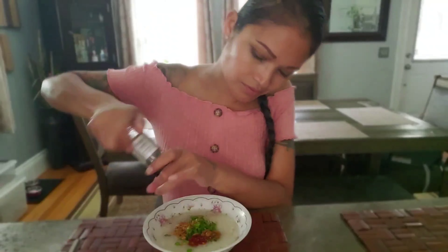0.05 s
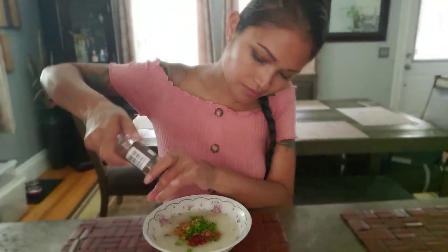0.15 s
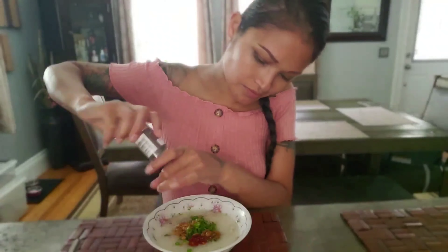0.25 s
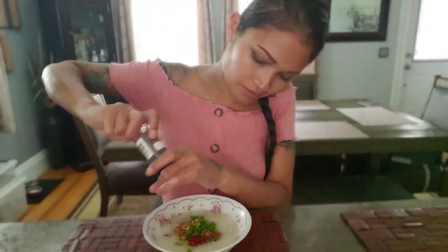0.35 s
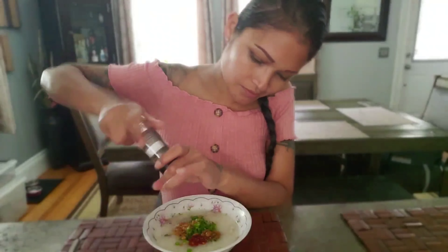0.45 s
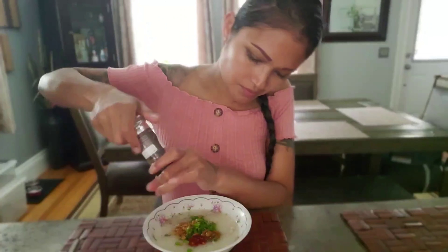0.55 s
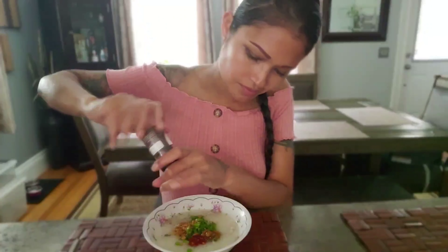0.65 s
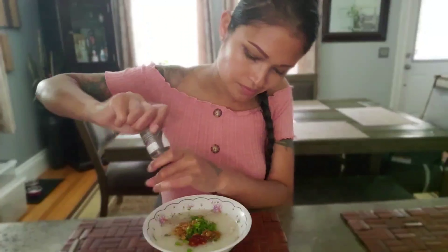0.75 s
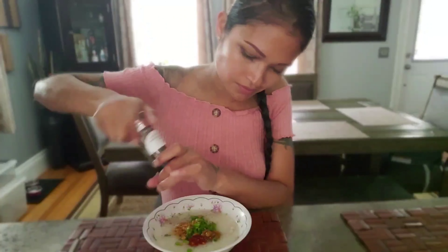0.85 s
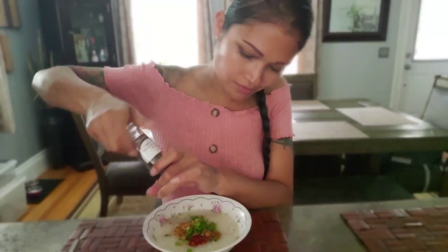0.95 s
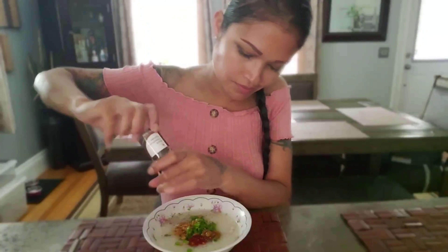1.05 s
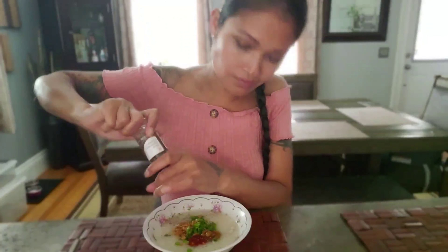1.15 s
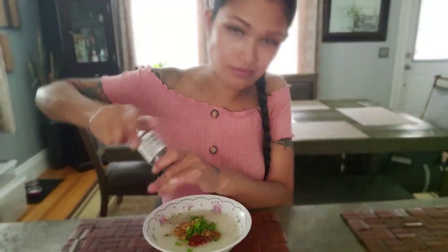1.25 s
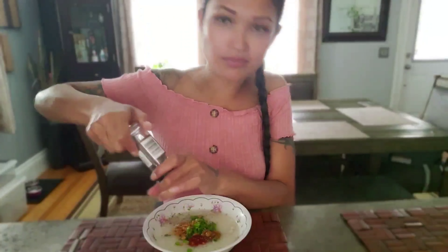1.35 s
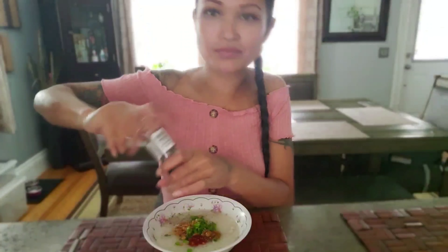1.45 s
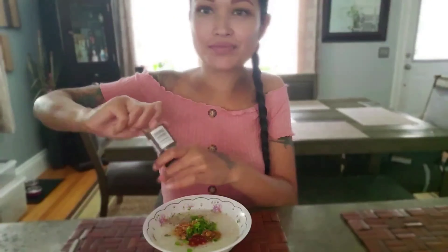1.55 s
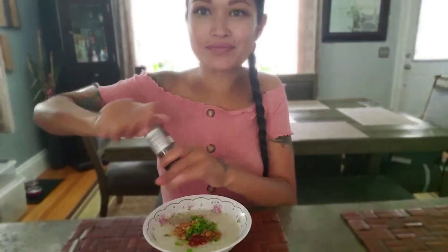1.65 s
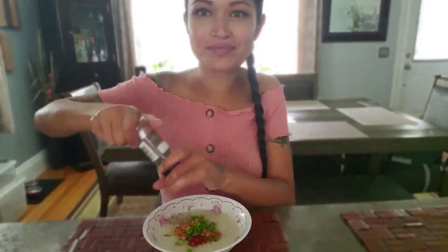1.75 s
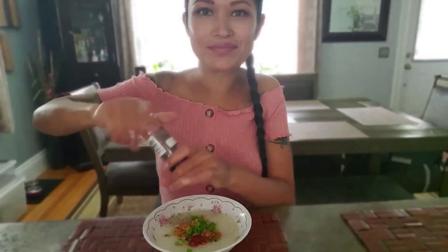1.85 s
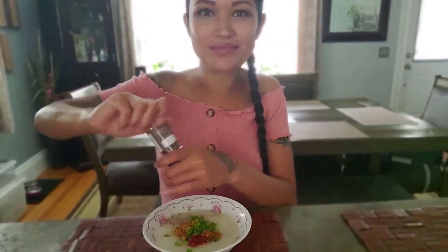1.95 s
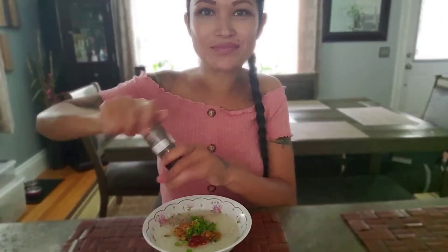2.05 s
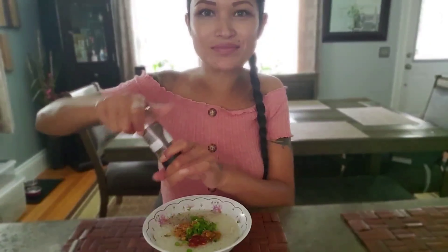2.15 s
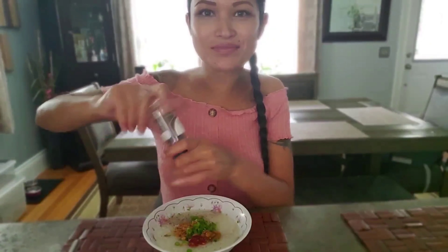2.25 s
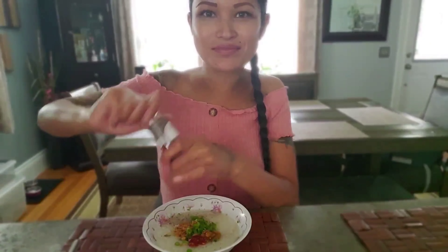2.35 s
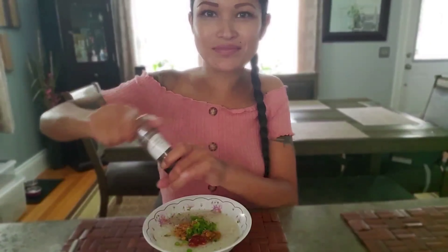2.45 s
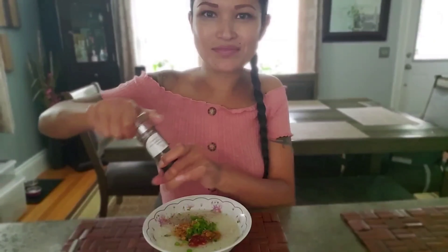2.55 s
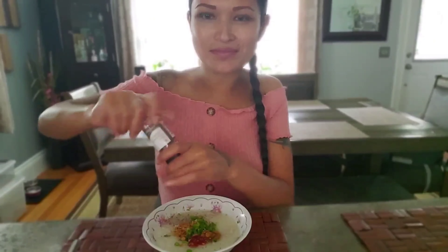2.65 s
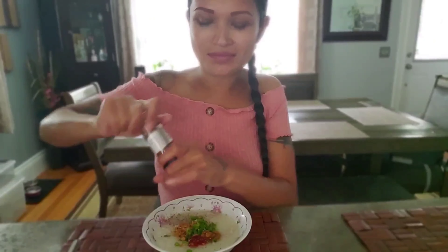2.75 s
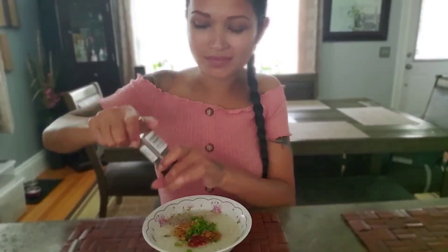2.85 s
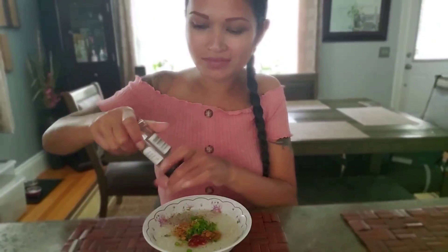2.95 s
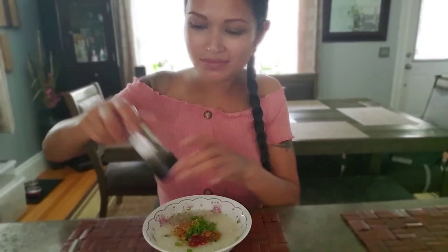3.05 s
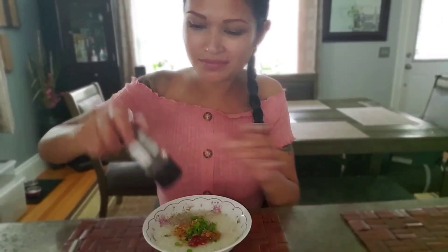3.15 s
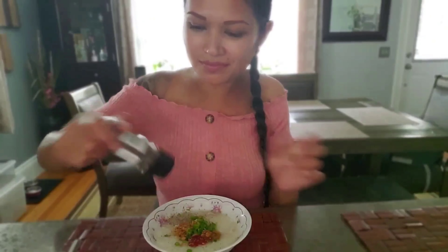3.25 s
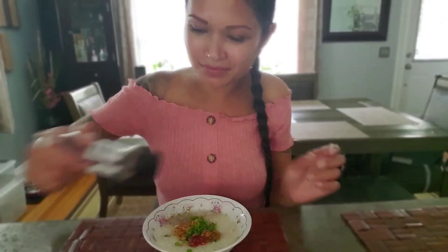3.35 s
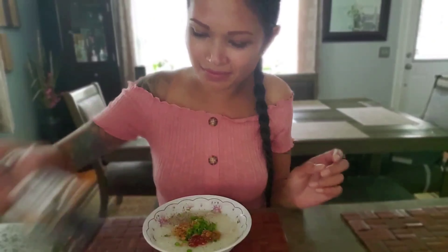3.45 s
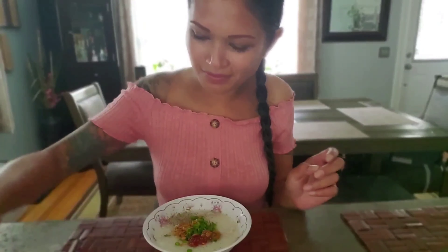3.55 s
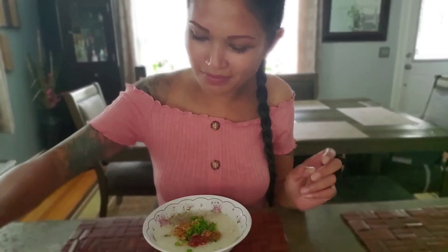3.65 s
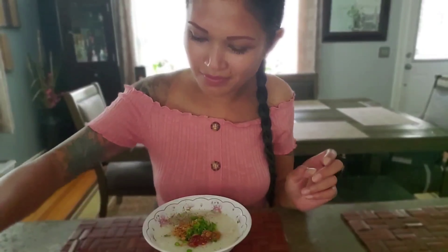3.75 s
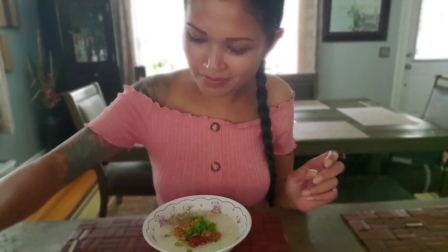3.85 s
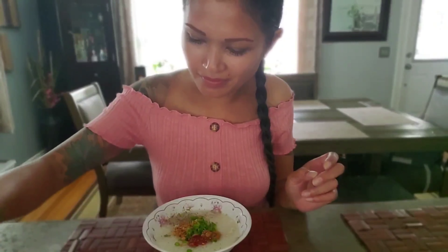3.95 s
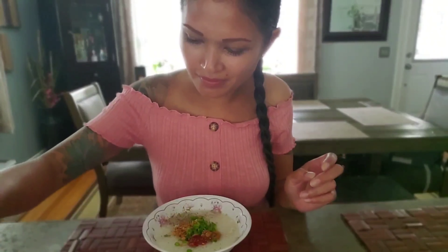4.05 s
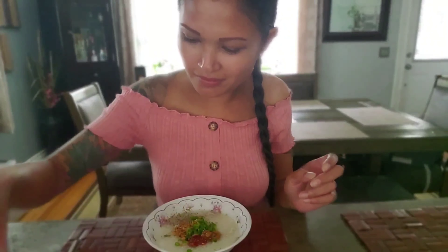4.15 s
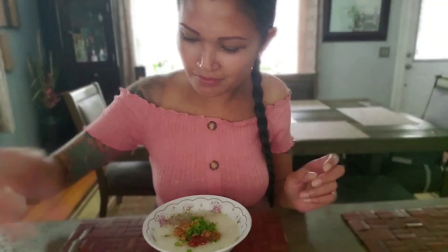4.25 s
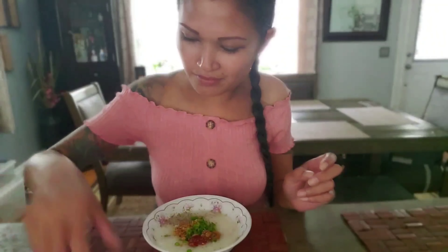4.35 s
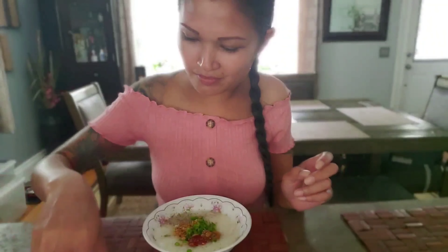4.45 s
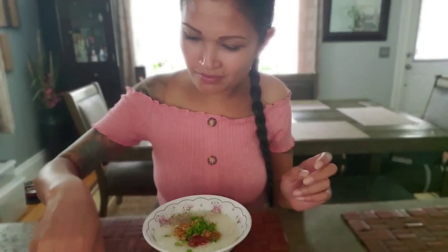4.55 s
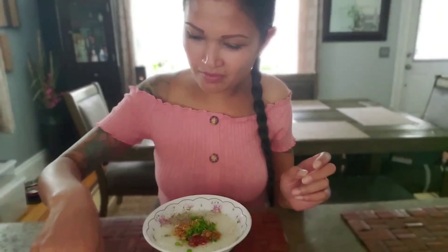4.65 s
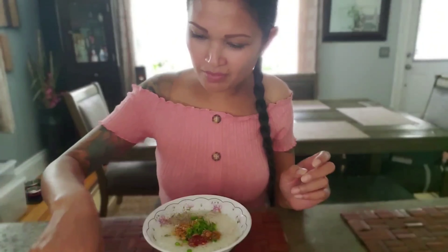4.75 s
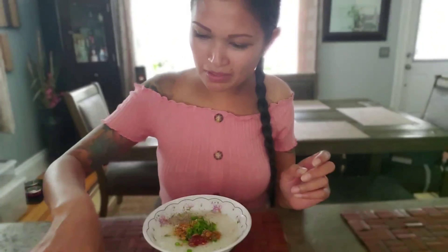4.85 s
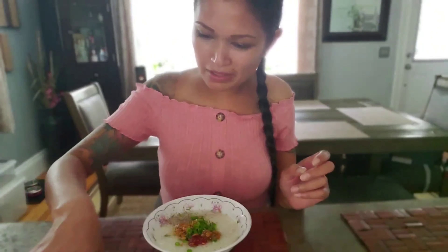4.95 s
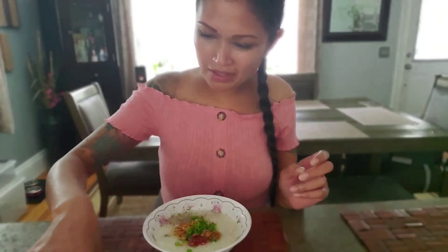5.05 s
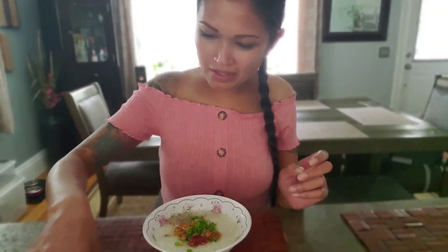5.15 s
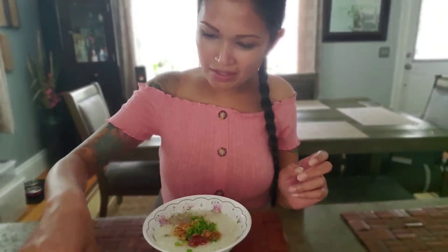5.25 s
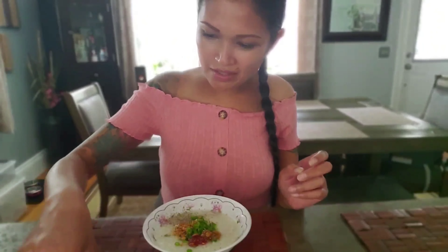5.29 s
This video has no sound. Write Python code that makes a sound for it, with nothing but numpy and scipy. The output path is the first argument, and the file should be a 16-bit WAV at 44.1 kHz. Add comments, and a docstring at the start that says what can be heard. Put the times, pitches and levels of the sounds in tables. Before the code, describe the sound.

Eight quick dry rasps of peppercorns cracking in a grinder, close up, then handling, muffled thuds and a faint slide on a table.

```python
"""A hand-twisted pepper grinder is turned eight times over a dish, in a lively dining room with a faint hum.
Each twist crushes peppercorns: sharp cracks (short noise puffs) over fine crumbling (dense tiny grains).
The cap sings thinly as the hand takes a new grip: uneven slips drive a narrow resonance.
Then the grinder is set down on the table, and a few soft knocks (clicks and dying sines) and a slide follow.
Echoes and a fading noise tail make the room; wavering sines and filtered noise make the hum and air."""
import sys
import numpy as np
from scipy import signal
from scipy.fft import rfft, irfft
from scipy.io import wavfile

SR = 44100
rng = np.random.default_rng(int(sys.argv[2]) if len(sys.argv) > 2 else 0)


def wav_out(sig):
    """Save sig, one row per channel (or a flat mono array), as 16-bit PCM at SR to the path in sys.argv[1]."""
    wavfile.write(sys.argv[1], SR, np.round(np.clip(np.atleast_2d(sig).T, -1, 1) * 32767).astype(np.int16))


N = 259831  # length in samples

# Levels in the tables come before the trims in the functions and the final tone shaping.
# Colours give only the balance between pitches.

# The steady hum. Each row: pitch in Hz, level in dB.
HUM_TONES = [(119.5, -64.5), (293.7, -57.5), (587.4, -79), (694.6, -82), (855, -83)]
# Colour of the room's low rush. Each row: pitch in Hz, relative level per Hz in dB.
AIR_COLOUR = [(20, -25), (50, -2), (110, -0.5), (180, -9), (300, -5), (500, -18), (800, -24), (1100, -34),
              (2500, -41.5), (6000, -43), (13000, -44), (16000, -48.5)]
# How long the room rings. Each row: pitch in Hz, time to fade by 60 dB in seconds.
ROOM_FADE = [(150, 0.9), (600, 0.36), (1400, 0.44), (3500, 0.39), (8000, .39), (15000, 0.35)]
# Reflections off table, dish and body. Each row: delay in seconds (scattered by up to 0.2 ms either way), level
# in dB.
NEAR_ECHOES = [(.0037, -8), (.0067, -12), (0.0113, -17.5), (0.0126, -20.5)]

# Knocks on the table. Each row: start in seconds, then click, wooden ring and deep thud levels in dB.
KNOCKS = [(3.012, -46, -83, -78), (3.754, -60.5, -81, -77.5), (3.811, -31.5, -50.5, -66),
          (3.836, -42, -77, -41.5), (4.09, -64, -68.5, -35), (4.657, -45, -50.5, -60),
          (4.832, -63, -53, -51), (5.385, -63, -71, -77)]
# Colour of a table click. Each row: pitch in Hz, relative level per Hz in dB.
CLICK_COLOUR = [(150, -11), (500, -10), (800, -16.5), (1600, 1.5), (2400, -3.5), (3200, -1), (4200, -1),
                (6000, -14.5), (9000, -17), (15000, -15)]
# Upper ringing of the table top. Each row: pitch in Hz, relative level in dB, time to fade by 60 dB in seconds.
WOOD_MODES = [(186, 8, 0.083), (252, -1.5, 0.13), (537, 0, 0.23), (1610, -9.5, 0.078), (2060, -20, .07),
              (2440, -10, 0.17)]
# Deep ringing of the table. Each row: pitch in Hz, relative level in dB, time to fade by 60 dB in seconds.
THUD_MODES = [(108.6, 1.5, 0.38), (128.5, -2, 0.2), (158.9, 6, 0.071)]

# The cap rubbing as it is gripped again. Each row: start in seconds, length in seconds, level in dB.
CAP_SQUEAKS = [(0.306, .1, -63), (0.662, .14, -58), (0.987, .2, -62.5), (1.484, 0.12, -55.5),
               (1.886, 0.13, -58.5), (2.281, .07, -51.5), (3.178, 0.18, -63.5)]
# Short ticks of the cap (the three rows before 1.6 s) and fingers brushing grinder and table. Each row: # start
# in seconds, length in seconds, level in dB, brightness in dB per octave.
TICKS_AND_BRUSHES = [(1.121, 0.0055, -53, 1), (1.529, .0069, -56.5, 2), (1.587, 0.004, -60, 1),
                     (2.359, .012, -42, 3.5), (2.983, 0.091, -60, -2.5), (3.186, 0.12, -54.5, 2),
                     (3.817, 0.092, -55, -3), (4.65, 0.09, -60, -3.5), (4.751, .19, -61.5, -6.5),
                     (5.001, 0.089, -61, -4), (5.032, 0.014, -50, 8.5)]
# Colour of rubbing skin before the brightness is set. Each row: pitch in Hz, relative level per Hz in dB.
SKIN_COLOUR = [(200, -12), (600, 3.5), (1300, -2), (2000, -5), (3700, -1), (5200, -4), (7500, 4),
               (14000, -6.5)]

# The twists. Each row: start in seconds, moment the burr bites in seconds, end in seconds,
# crisp crumbling level in dB, husky crumbling level in dB, pitch where the body sounds most in Hz.
TWISTS = [(0, -0.02, .116, -29.5, -32.5, 1800), (0.391, 0.429, 0.49, -31, -32, 2100),
          (0.774, 0.817, 0.88, -33.5, -33, 2100), (1.182, 1.262, 1.302, -35.5, -35.5, 2214),
          (1.638, 1.647, 1.718, -35, -27.5, 1700), (2.018, 2.024, 2.122, -31.5, -35.5, 2900),
          (2.373, 2.423, 2.538, -29.5, -38.5, 3300), (2.773, 2.792, 2.87, -43, -40, 3090)]
# Whole peppercorns that split. Each row: time in seconds, snap level in dB,
# level of the knock on the grinder's body in dB, centre pitch of the snap in Hz.
CRACKS = [(0.0093, -14.5, -27, 13500), (.0277, -17, -28.5, 9840), (0.0331, -22, -30, 6800),
          (0.0388, -26.5, -25.5, 7000), (0.066, -17.5, -33, 9320), (0.0861, -23, -28, 9355),
          (0.1009, -15, -36.5, 6600), (0.4095, -19, -44, 7000), (0.433, -18.5, -27.5, 9200),
          (0.4543, -19.5, -29.5, 13900), (0.47, -28, -18, 6033), (.4739, -36, -23.5, 7400),
          (0.787, -27.5, -31.5, 7284), (0.8193, -20.5, -27, 12240), (.8558, -31, -21, 7600),
          (.8795, -23, -35.5, 7500), (1.1869, -25, -39.5, 7290), (1.2264, -25.5, -41.5, 8335),
          (1.2411, -27.5, -29, 7230), (1.2736, -14, -29.5, 8900), (1.6436, -21.5, -19.5, 8990),
          (1.6636, -17.5, -36, 6900), (1.6835, -20.5, -24, 9210), (1.7052, -12.5, -31.5, 7600),
          (1.7163, -19, -26, 8990), (2.0293, -21.5, -25.5, 9100), (2.0528, -17.5, -23.5, 8970),
          (2.1033, -19.5, -25.5, 6770), (2.1147, -25, -26, 7000), (2.403, -29, -41.5, 7610),
          (2.4219, -16, -24.5, 9030), (2.4339, -14.5, -33, 13300), (2.4927, -17, -27.5, 8600),
          (2.7797, -39, -28.5, 9300), (2.7978, -26.5, -33.5, 7500), (2.8222, -14, -32, 6790)]
# Colour of a splitting corn. Each row: pitch in Hz, relative level per Hz in dB.
SNAP_COLOUR = [(1500, -41), (3500, -4), (5000, -5.5), (6900, 2), (8000, -2), (9100, -0.5), (10200, -5),
               (12000, -2), (14500, -3.5), (16000, -24.5)]
# Colour of the grinder's body. Each row: pitch in Hz, relative level per Hz in dB.
BODY_COLOUR = [(100, -15), (300, -15), (700, -19), (950, -13.5), (1350, -3), (2000, -3), (2550, 4.5),
               (3100, -2), (4000, -3.5), (5500, -14), (9000, -30.5)]
# The grinder's short ringing. Each row: pitch in Hz, gain in dB, time to fade by 60 dB in seconds.
SHELL_MODES = [(1254, -52, 0.27), (1415, -53, .09), (1652, -49, .11), (1813, -56, 0.044),
               (2160, -51.5, .07), (2404, -54, .07), (2678, -55.5, 0.068), (3718, -56.5, .07)]

# Final treble roll-off. Each row: pitch in Hz, gain in dB.
TREBLE_ROLLOFF = [(14700, -1), (15200, -22.5), (16000, -22.5)]

AIR_DB = -56.5
# the slide on the table swells and fades: times, loudest level and the drop at its ends
SLIDE_START_S, SLIDE_PEAK_S, SLIDE_END_S, SLIDE_DB, SLIDE_FADE_DB = 4.545, 4.674, 4.98, -61, -16.5
# its pitch at the loudest moment, how far that moves with the level, and the resonance's width
SLIDE_HZ, SLIDE_HZ_PER_DB, SLIDE_WIDTH_HZ = 2605, 4, 280
SQUEAK_HZ = 7688
# the fingers close on the cap just before each later twist; the tilt is in dB per octave
GRIP_LEAD_S, GRIP_S, GRIP_DB, GRIP_TILT_DB = .034, 0.025, -59, 3.5
# time to get the turn going, level while it runs slack, and how long before the bite the force rises
TAKE_UP_S, SLACK_DB, BITE_S = 0.0077, -7, 0.0022
# fragments that break again as the burr's teeth pass: levels are relative to the twist's crumbling
CHIPS_PER_S, CHIP_SNAP_DB, CHIP_KNOCK_DB, CHIP_SPREAD_DB = 80, 3.5, -2.5, 2.5
CHIP_HZ, CHIP_OCTAVES = 7850, .14  # centre and scatter of their pitch
KNOCK_OCTAVES_PER_DB = .02  # the stronger the snap beside the knock, the higher the body sounds
KNOCK_SCATTER_OCTAVES = .25  # each fracture strikes the body at another place
CEILING = .85  # peaks are rounded off near this level (full scale is 1)
EDGE_HZ = 16500  # upper limit of the sound


def amp(db):
    """Turns decibels into a gain."""
    return 10 ** (np.asarray(db) / 20)


def unit(x):
    """Scales a sound to an average (rms) strength of 1."""
    return x / np.sqrt(np.mean(x ** 2) + 1e-20)


def read(points, hz):
    """Reads a table between its rows, with pitch on a logarithmic scale."""
    f, value = np.transpose(points)
    return np.interp(np.log(hz + 1), np.log(f + 1), value)


def add(mix, s, sound):
    """Mixes a sound in at a time in seconds."""
    part = mix[..., max(round(s * SR), 0):][..., :sound.shape[-1]]
    part += sound[..., :part.shape[-1]]


def colour(x, points, size=2048):
    """Filters with a table's colour; the filter has unit energy and never sounds ahead of its input."""
    cepstrum = irfft(np.log(amp(read(points, np.fft.rfftfreq(size, 1 / SR)))))
    # folding the cepstrum forward in time packs the filter's energy at its start
    cepstrum[1:size // 2] *= 2
    cepstrum[size // 2 + 1:] = 0
    taps = irfft(np.exp(rfft(cepstrum)))
    taps /= np.linalg.norm(taps)
    return signal.oaconvolve(x, taps[None], axes=1)[:, :x.shape[1]]


def pair(noise, likeness):
    """Turns three unrelated signals into two channels that share a part."""
    share = np.clip(likeness, 0, 1)
    return np.sqrt(share) * noise[0] + np.sqrt(1 - share) * noise[1:]


def ring(modes):
    """A struck object rings: a sum of dying sines, half a second long."""
    t = np.arange(SR // 2) / SR
    return sum(amp(db) * 1e-3 ** (t / t60) * np.sin(2 * np.pi * hz * t) for hz, db, t60 in modes)


def resonate(x, hz, width):
    """A steep resonance at a fixed or moving pitch, scaled to rms 1."""
    turn = np.exp(2j * np.pi * np.cumsum(hz * np.ones(x.shape[1])) / SR)
    pole = np.exp(-np.pi * width / SR)
    # shift the pitch down to zero, smooth twice, and shift it back
    smooth = signal.lfilter([1], np.poly([pole, pole]), x / turn)
    return unit((turn * smooth).real)


def burst(decay, likeness, centre_hz, bump_db, octaves=0.063, size=512):
    """A dying noise puff shaped round its own pitch, with the energy of 2 ms at rms 1."""
    t, hz = np.arange(size) / SR, np.fft.rfftfreq(size, 1 / SR)
    noise = pair(rng.standard_normal((3, size)), likeness)
    puff = rfft(np.roll(noise * t * np.exp(-t / decay), size // 32, axis=1))
    puff /= np.sqrt(abs(puff) + 1e-12)  # a brittle break leaves few gaps in its spectrum
    bump = np.exp(-.5 * (np.log2((hz + 1) / centre_hz) / octaves) ** 2)
    return unit(irfft(puff * amp(bump_db * bump))) * np.sqrt(.002 * SR / size)


def crumbs(per_s, spread_db, likeness):
    """A dense train of tiny noise grains of uneven size; each one's power dies with a 0.3 ms time constant."""
    happens = rng.random(N) < per_s / SR
    size = amp(spread_db * np.minimum(rng.exponential(1, N), 3)) * happens
    power = signal.lfilter([1], [1, -np.exp(-1 / (.0003 * SR))], size ** 2)
    return unit(pair(rng.standard_normal((3, N)), likeness) * np.sqrt(power))


def background(likeness=0.82):
    """An appliance hums, slightly wavering in level and phase, over the low rush of the room."""
    t = np.arange(N) / SR
    noise = rfft(pair(rng.standard_normal((3, N)), likeness))
    air = irfft(noise * amp(read(AIR_COLOUR, np.fft.rfftfreq(N, 1 / SR))), N)
    knots = np.linspace(0, t[-1], num=50)
    hum = 0
    for hz, db in HUM_TONES:
        swell, drift = (np.interp(t, knots, v) for v in rng.standard_normal((2, len(knots))))
        tone = np.sin(2 * np.pi * hz * t + .2 * drift)
        hum = hum + np.sqrt(2) * amp(db) * (1 + .12 * swell) * tone
    return amp(AIR_DB) * unit(air) + hum


def room(x, wet_db=-3.0, likeness=0.074, build=0.00093):
    """The room returns a few near reflections and a noise tail in which each band dies at its own speed."""
    size = SR * 3 // 4
    hz, t, z = signal.stft(pair(rng.standard_normal((3, size)), likeness), SR, nperseg=256)
    fade = 1e-3 ** (t / read(ROOM_FADE, hz)[:, None])
    tail = signal.istft(z * fade, SR, nperseg=256)[1]
    tail *= 1 - np.exp(-np.arange(tail.shape[1]) / (build * SR))
    tail *= amp(wet_db) / np.linalg.norm(tail[0])
    for s, db in NEAR_ECHOES:
        for side in tail:
            add(side, s + rng.uniform(-.0002, 0.00018), amp([db]))  # up to 0.2 ms either way
    return signal.fftconvolve(x, tail, axes=1)[:, :N]


def slide():
    """Something is pushed across the table: small slips excite a squeak whose pitch follows its swell and fade."""
    t = np.arange(N) / SR
    times = [SLIDE_START_S, SLIDE_PEAK_S, SLIDE_END_S]
    swell_db = np.interp(t, times, [SLIDE_FADE_DB, 0, SLIDE_FADE_DB])
    push = amp(SLIDE_DB + swell_db) * ((t > SLIDE_START_S) & (t < SLIDE_END_S))
    slips = crumbs(per_s=900, spread_db=2, likeness=.6)
    return push * resonate(slips, SLIDE_HZ + SLIDE_HZ_PER_DB * swell_db, SLIDE_WIDTH_HZ)


def table():
    """Hard contacts click and ring the top; heavy ones also shake the whole table. Returns both."""
    taps, thuds = np.zeros((2, 2, N))
    blows = np.zeros((2, N))
    thud_rise = 1 - np.exp(-np.arange(SR // 2) / (0.0091 * SR))
    for s, click_db, wood_db, thud_db in KNOCKS:
        click = burst(decay=0.00084, likeness=1.0, centre_hz=1660, bump_db=-0.5)
        add(taps, s, amp(click_db) * click)
        add(blows, s, amp(wood_db) * ring(WOOD_MODES))
        add(thuds, s, amp(thud_db) * ring(THUD_MODES) * thud_rise)
    top = colour(taps, CLICK_COLOUR) + blows
    top[0] = np.roll(top[0], 6)  # off to one side: it reaches the left channel 6 samples later
    return top, thuds


def rubbing():
    """Light friction: slips ring as the cap's thin squeak, and dense grit makes the cap's small ticks and the
    brushing fingers."""
    out = np.zeros((2, N))
    slips = crumbs(per_s=600, spread_db=0, likeness=.83)
    for s, length, db in CAP_SQUEAKS:
        n = int(length * SR)
        squeak = resonate(slips[:, int(s * SR):][:, :SR // 2], SQUEAK_HZ, width=320)
        add(out, s, amp(db) * squeak[:, :n] * signal.windows.tukey(n, .7))
    grit = colour(crumbs(per_s=3400, spread_db=0.5, likeness=0.2), SKIN_COLOUR)
    octaves = np.log2(np.maximum(np.fft.rfftfreq(SR // 2, 1 / SR), 400) / 4000)
    grips = [(twist[0] - GRIP_LEAD_S, GRIP_S, GRIP_DB, GRIP_TILT_DB) for twist in TWISTS[1:]]
    for s, length, db, tilt in TICKS_AND_BRUSHES + grips:
        n = int(length * SR)
        stroke = unit(irfft(rfft(grit[:, int(s * SR):], SR // 2) * amp(tilt * octaves)))
        add(out, s, amp(db) * stroke[:, :n] * signal.windows.tukey(n, .6))
    return out


def effort(t, start, bite):
    """Force on the corns: the turn starts softly and runs slack until the burr bites."""
    take_up = np.clip((t - start) / TAKE_UP_S, .01, 1)
    slack = np.clip((bite - t) / BITE_S, 0, 1)
    return take_up * amp(SLACK_DB * slack)


def emphasise(x, centre_hz, bump_db=5, octaves=.45):
    """Lifts a broad band round one pitch and scales to rms 1."""
    hz = np.fft.rfftfreq(x.shape[1], 1 / SR)
    bump = np.exp(-.5 * (np.log2((hz + 1) / centre_hz) / octaves) ** 2)
    return unit(irfft(rfft(x) * amp(bump_db * bump), x.shape[1]))


def chips(count=24):
    """Lesser fractures at uneven intervals through each twist, as rows like those of CRACKS."""
    rows = []
    for start, bite, end, crisp_db, husk_db, _ in TWISTS:
        times = start + (np.arange(count) + rng.random(count)) / CHIPS_PER_S
        for s, (snap, knock, pitch) in zip(times, rng.standard_normal((count, 3))):
            if s < end:
                push_db = 20 * np.log10(effort(s, start, bite))
                snap_db = crisp_db + push_db + CHIP_SNAP_DB + CHIP_SPREAD_DB * snap
                knock_db = husk_db + push_db + CHIP_KNOCK_DB + CHIP_SPREAD_DB * knock
                rows.append((s, snap_db, knock_db, CHIP_HZ * 2 ** (CHIP_OCTAVES * pitch)))
    return rows


def grinder(crumble_db=-1.5, left_db=0.4, snaps_db=0.18, knocks_db=-1.13, husk_trim_db=-2.5, size=8192):
    """Crumbling jumps up when the burr bites; it and the cracks sound directly and shake the grinder's body."""
    crisp, husk = np.zeros((2, 2, N))
    fine = crumbs(per_s=600, spread_db=3.5, likeness=.35)
    coarse = crumbs(per_s=600, spread_db=3, likeness=.75)
    for start, bite, end, crisp_db, husk_db, body_hz in TWISTS:
        at = round(start * SR) + np.arange(size)
        force = (at / SR <= end) * effort(at / SR, start, bite) * amp(crumble_db)
        add(crisp, start, amp(crisp_db) * force * fine[:, at])
        add(husk, start, amp(husk_db + husk_trim_db) * force * emphasise(coarse[:, at], body_hz))
    _, bites, *_, body_hz = np.transpose(TWISTS)
    for s, snap_db, knock_db, snap_hz in CRACKS + chips():
        octaves = KNOCK_OCTAVES_PER_DB * (snap_db - knock_db) + KNOCK_SCATTER_OCTAVES * rng.standard_normal()
        knock_hz = np.interp(s, bites, body_hz) * 2 ** octaves
        snap = burst(decay=.00045, likeness=.35, centre_hz=snap_hz, bump_db=5, octaves=.17)
        knock = burst(decay=.00075, likeness=.85, centre_hz=knock_hz, bump_db=5, octaves=.25)
        # placed half a millisecond early, as a puff takes a moment to swell
        add(crisp, s - .0005, amp(snap_db + snaps_db) * snap)
        add(husk, s - .0005, amp(knock_db + knocks_db) * knock)
    husk = colour(husk, BODY_COLOUR)
    shell = signal.oaconvolve(husk, ring(SHELL_MODES)[None], axes=1)[:, :N]
    balance = amp([[left_db], [-left_db]])
    return colour(crisp, SNAP_COLOUR) * balance + husk + shell


def scene():
    """Grinder, hands and table in the dining room; the fractures send other waves to the walls than straight out."""
    top, thuds = table()
    handling = rubbing() + slide() + top
    direct = grinder() + handling
    reflected = room(grinder() + handling)  # a fresh set of random fractures
    return direct + reflected + thuds + background()


def record(dry):
    """All drops slightly and the top treble much more; the highest peaks are rounded, then the band is limited."""
    rolloff = amp(read(TREBLE_ROLLOFF, np.fft.rfftfreq(2 * N, 1 / SR)))
    soft = irfft(rfft(dry, 2 * N) * rolloff)[:, :N]
    held = soft / (1 + (soft / CEILING) ** 4) ** .25
    low_pass = signal.firwin(511, EDGE_HZ, window=("kaiser", 9), fs=SR)
    return signal.oaconvolve(held, low_pass[None], "same")


dry = scene()
out = record(dry)
wav_out(out)
```